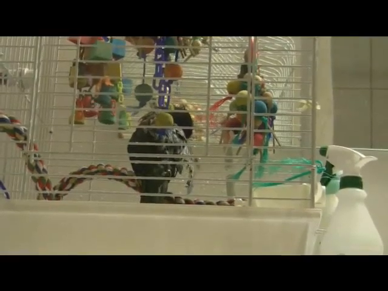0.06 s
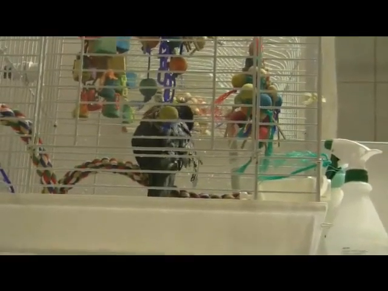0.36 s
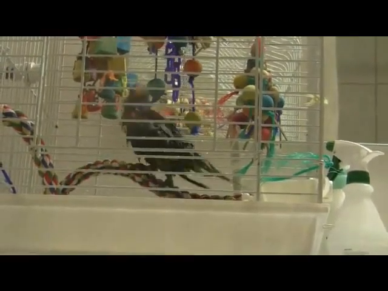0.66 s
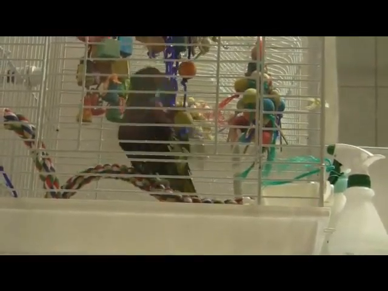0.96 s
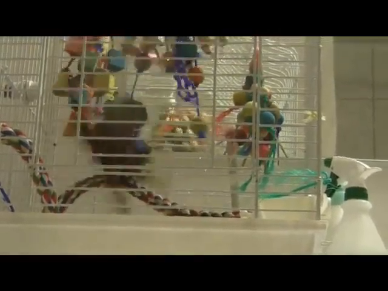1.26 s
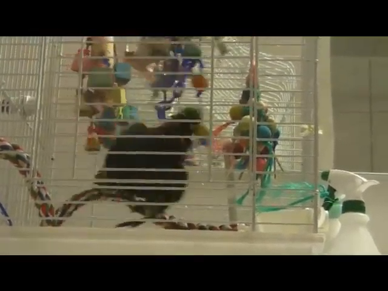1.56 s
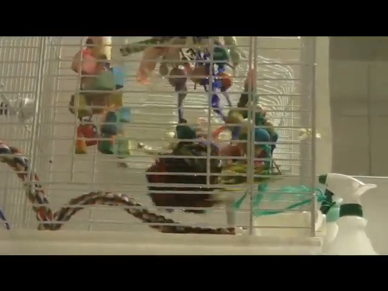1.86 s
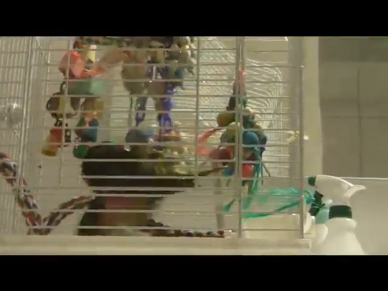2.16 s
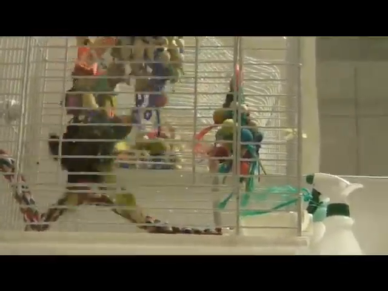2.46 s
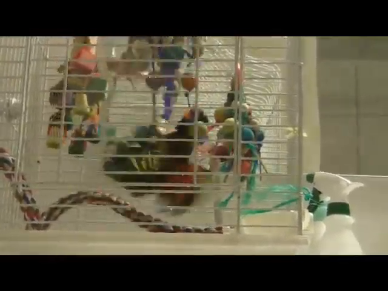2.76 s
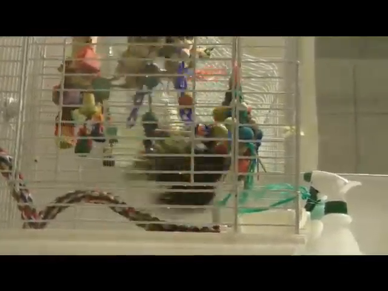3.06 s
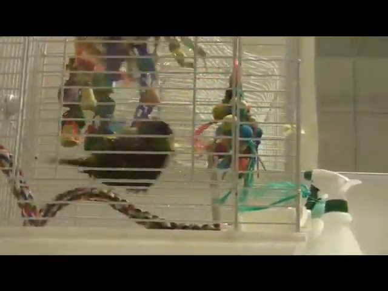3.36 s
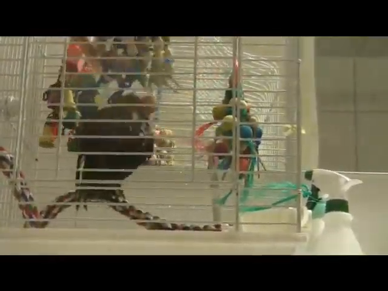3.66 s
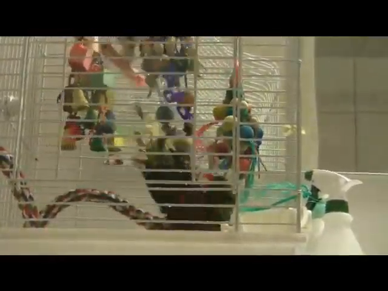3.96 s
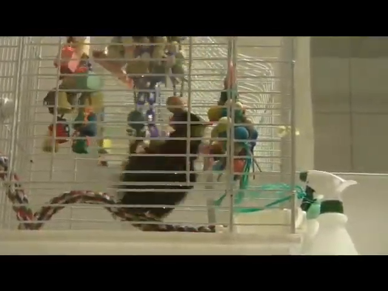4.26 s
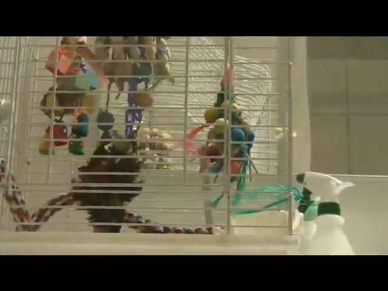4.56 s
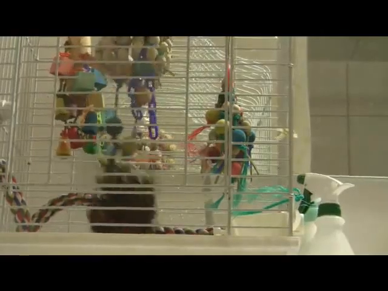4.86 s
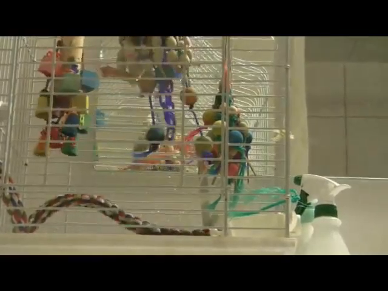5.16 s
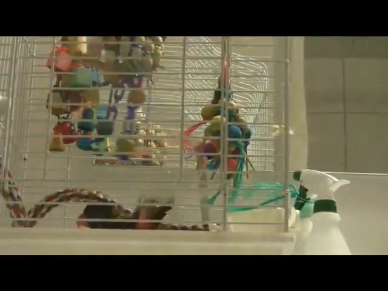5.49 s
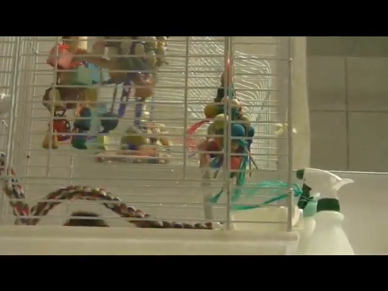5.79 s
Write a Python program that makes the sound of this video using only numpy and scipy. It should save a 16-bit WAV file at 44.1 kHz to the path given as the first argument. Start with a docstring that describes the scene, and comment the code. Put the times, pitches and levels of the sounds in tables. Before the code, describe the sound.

A parrot clambers about its wire cage, feathers rustling in short flutters while hanging toys knock, a chain clinks and the wires ring faintly. After about four seconds it gives one loud squawk that rises from a rasp to a shrill whistle and falls back. A quick run of soft wing beats follows. The sound is fairly close, in a small tiled room with a short reverberation and a faint rush of air.

```python
"""A soft rush of room air and a few light knocks come first, as a parrot clambers about its wire cage.
Its feathers rustle by friction; toys, chain links and wires are struck and ring as damped resonators.
It gives one loud squawk, the membranes of its syrinx breaking from a rasp into a rising whistle and
back, then beats its wings on the cage floor. The tiled room adds a short reverberation."""
import sys
import numpy as np
from scipy import signal
from scipy.fft import rfft, irfft
from scipy.io import wavfile
from scipy.ndimage import uniform_filter1d, minimum_filter1d

SR = 44100
rng = np.random.default_rng(int(sys.argv[2]) if len(sys.argv) > 2 else 0)


def store_wav(level_fs):
    """Save 16-bit WAV to argv[1]."""
    pcm = np.round(np.clip(np.atleast_2d(level_fs), -1, 1) * 32767)
    wavfile.write(sys.argv[1], SR, pcm.T.astype(np.int16))


N = 265923
TIME = np.arange(N) / SR

# The diffuse field at two close microphones. Each row: frequency in Hz, coherence from 0 to 1.
COHERENCE = [(30, 0.36), (70, 0.66), (250, 0.69), (600, 0.554), (2000, 0.23), (5000, 0.089), (9000, 0.16),
             (15000, .15)]
# The tiled room. Each row: frequency in Hz, reverberation time in seconds.
ROOM_T60 = [(200, 0.33), (1000, 0.388), (3000, 0.24), (6000, 0.286), (10000, 0.32), (16000, 0.03)]
# Spectra of the room's rush, air pushed by wings, feather rustle, feather fizz, a wing beat and a
# chain link. Each row: frequency in Hz, relative level in dB.
RUSH_SPECTRUM = [(12, -37), (20, -15), (53, -6), (86, -15.5), (123, -7), (177, -17.5), (221, -3.5),
                 (247, -5), (409, -11.5), (445, -8), (757, -14.5), (947, -17.5), (1480, -21), (5510, -28.5),
                 (15900, -39)]
AIR_SPECTRUM = [(40, -27), (80, -7.5), (125, 0), (170, -11.5), (240, 4), (400, 1.5), (1000, -2.5),
                (1500, -10), (2200, -12.5), (4000, -49.5)]
RUSTLE_SPECTRUM = [(700, -28.5), (1600, -0.5), (3000, 0), (4800, -1.5), (6500, -17.5), (10000, -44.5)]
FIZZ_SPECTRUM = [(3500, 4), (6500, 2.5), (9200, 0), (11000, -3), (13000, -7.5), (16000, -13)]
WING_SPECTRUM = [(100, -8.5), (350, -31), (700, -3), (1100, -3.5), (1700, 0), (2200, -13.5), (5000, -20),
                 (10000, -27), (16000, -38)]
LINK_SPECTRUM = [(3000, -18), (7000, -17.5), (8400, -6.5), (9000, -0.5), (9400, -5), (10200, -17),
                 (15000, -27.5)]
# Jolts of the cage wall. Each row: start in seconds, level in dB, brightness in dB per octave.
WALL_JOLTS = [(1.214, -76, -11), (1.345, -52.5, -10), (2.3, -68.5, 1), (2.419, -66, 2.5), (2.499, -64, -24),
              (5.634, -65, -13)]
# Modes of the wall's wires. Each row: frequency in Hz, T60 in seconds, relative level in dB.
WIRE_MODES = [(969, 0.74, -2), (1050, 0.63, -2.5), (1640, 1, -5.5), (2000, 0.6, 0), (2860, 0.23, -15),
              (3407, 0.21, 4.5), (4350, 0.25, -13.5), (4900, 0.66, -21)]
# Knocks of toys, beak and claws. Each row: start in seconds, relative level in dB, centre frequency
# in Hz, half-width in octaves, T60 in seconds.
TOY_KNOCKS = [ (0.431, -62.5, 5130, 0.67, 0.086), (0.830, -57, 1560, 0.454, 0.12),
              (1.03, -56.5, 3850, 0.65, 0.029), (1.187, -42.5, 10800, 0.13, 0.09),
              (1.203, -35.5, 3315, 0.475, 0.11), (1.209, -35.5, 3460, 0.47, 0.078),
              (1.280, -48, 11900, 0.23, 0.091), (1.449, -41, 3300, 0.44, 0.04),
              (1.574, -55.5, 6940, 0.53, 0.02), (1.657, -55, 7060, 0.54, 0.039),
              (1.684, -51, 2980, 1.3, 0.0423), (2.060, -41.5, 4310, 0.71, 0.017),
              (2.302, -50, 1550, 0.12, 0.1), (2.354, -41, 270.3, 0.23, 0.066),
              (2.440, -44, 684, 1.2, 0.044), (2.741, -51.5, 7000, 2.1, 0.045),
              (2.745, -50.5, 790, 0.68, 0.066), (2.891, -47, 4500, 1.1, 0.078),
              (2.938, -43.5, 3470, 0.36, 0.021), (3.468, -57, 5560, 0.92, 0.113),
              (3.678, -49.5, 5540, 0.8, 0.042), (3.762, -57, 2820, 0.43, 0.05),
              (3.950, -52, 2891, 0.766, 0.51), (3.993, -49, 4970, 0.4, 0.054),
              (5.193, -47, 5343, 0.1, 0.068), (5.939, -49, 2550, 0.7, 0.113)]
# Clinks of the chain. Each row: start in seconds, relative level in dB, T60 in seconds.
CHAIN_CLINKS = [(1.131, -49.5, 0.325), (1.819, -48.5, 0.052), (2.535, -55, 0.11), (2.816, -45, 0.0407),
                (3.043, -56, 0.14), (3.355, -54.5, 0.087), (3.470, -59.5, 0.105), (3.527, -52, 0.23),
                (3.842, -63.5, 0.54), (3.869, -60, 0.206), (3.905, -52.5, 0.205), (3.937, -46.5, 0.084),
                (3.994, -42.5, 0.0395), (4.130, -60, 0.18)]
# Plucks of a cage bar. Each row: start in seconds, relative level in dB.
BAR_PLUCKS = [(2.245, -46), (5.120, -47.5), (5.845, -57)]
# Modes of that bar. Each row: frequency in Hz, relative level in dB, T60 in seconds.
BAR_MODES = [(2812, 0, 0.21), (4416, -3, 0.08), (5040, -10, 0.11), (6300, -5, 0.071), (7747, -12, .12),
             (8650, -5.5, .1)]
# Hops, flutters and shuffles. Each row: start in seconds, length in seconds, effort in dB, scrape in dB.
BIRD_MOVES = [ (0.819, 0.0285, -70, 4.5), (0.947, 0.066, -61.5, -24), (1.117, 0.027, -69.5, 5.5),
              (1.154, 0.18, -48.5, -2), (1.386, 0.256, -62.5, -5.5), (1.656, 0.053, -61, -2),
              (1.761, 0.065, -70, 4), (1.974, 0.102, -61, -3.5), (2.166, 0.034, -62.5, -5),
              (2.234, 0.044, -57.5, 4.5), (2.291, 0.136, -56, 1), (2.501, 0.05, -62, 1),
              (2.724, 0.163, -65.5, 4), (2.874, 0.0595, -59.5, -1), (2.994, 0.056, -68.5, 10.5),
              (3.111, 0.74, -72.5, 5.5), (3.546, 0.11, -70, -1), (3.841, 0.09, -70.5, 3),
              (3.938, 0.025, -62, 2), (4.127, 0.035, -80.5, -2), (4.373, 0.045, -62.5, -5),
              (5.125, 0.04, -50.5, -8), (5.294, 0.13, -60.5, -6.5), (5.494, 0.258, -56.5, -11),
              (5.715, 0.033, -57.5, 2.5), (5.923, 0.084, -60.5, 0.5)]
# Wing beats. Each row: start in seconds, level in dB, length in seconds, treble tilt in dB per octave.
WING_BEATS = [(1.181, -48, 0.032, 11), (2.347, -53.5, 0.0187, 13), (5.338, -59.5, 0.042, -1),
              (5.380, -52.5, 0.036, 2.5), (5.487, -52.5, 0.0324, 5), (5.54, -49, 0.043, 3.5),
              (5.628, -48.5, 0.049, 0.5), (5.717, -49.5, 0.0334, 6), (5.773, -56, 0.041, 8.5),
              (5.933, -56.5, 0.0254, 7)]
# The squawk's high and low notes. Each row: start in seconds, length in seconds, first and last pitch
# in Hz, relative level in dB, place of the peak from 0 to 1, roughness from 0 to 1.
WHISTLE_NOTES = [ (4.438, 0.0746, 2342, 2701, -22.5, 0.65, 0.16),
                 (4.506, 0.063, 2195, 2160, -29.5, 0.18, 0.7),
                 (4.613, 0.127, 3275, 4682, -12.5, 0.87, 0.18), (4.722, 0.060, 5767, 5516, -11, 0.4, 0.17),
                 (4.849, 0.05, 3725, 3520, -30, 0.25, 0.45), (4.859, 0.035, 3058, 2934, -24.5, 0.36, 0.46),
                 (4.897, 0.065, 3100, 2415, -29, 0.3, 0.8)]
CROAK_NOTES = [ (4.415, 0.031, 789, 802, -30.5, 0.5, 0.39), (4.519, 0.039, 794, 793, -26.5, 1, 0.62),
               (4.564, 0.026, 785, 784, -34.5, 0.55, 0.61), (4.833, 0.058, 1026, 999, -38.5, 0.5, 0.79),
               (4.912, 0.136, 830.2, 750.4, -28, 0.42, 0.66)]
# The throat's response with the beak wide and narrow. Each row: frequency in Hz, gain in dB.
WIDE_THROAT = [(1500, -24), (2400, 6), (3200, -0.5), (4300, 8), (5400, 7), (6400, -7.5), (8200, -14.5),
               (9100, -12.5), (10000, -15.5), (11200, -16), (12400, -26.5), (16000, -31)]
NARROW_THROAT = [(450, -31.5), (790, -9.5), (1150, -7.5), (1600, -8.5), (2300, 4.5), (3150, 8), (3700, -3),
                 (4300, 7), (5400, -15.5), (6000, -27), (6700, -12.5), (9000, -24.5), (16000, -47.5)]
# The voice's phase between the microphones. Each row: frequency in Hz, lead of the left in radians.
VOICE_PHASE = [(3000, -1), (5400, 0.6), (9000, 0.76), (11400, 2), (16000, 2.5)]
# The voice's balance between them. Each row: frequency in Hz, left minus right level in dB.
VOICE_BALANCE = [(4500, 0), (8100, -5), (15000, -6.5)]


def amp(db):
    """Amplitude grows tenfold for every 20 dB."""
    return 10 ** (np.asarray(db) / 20)


def unit(x):
    """Normalisation to an rms of 1."""
    return x / np.sqrt(np.mean(x ** 2) + 1e-20)


def read(points, hz):
    """Interpolation of a table on a log-frequency axis."""
    f, value = np.transpose(points)
    return np.interp(np.log(hz + 1), np.log(f + 1), value)


def bins(size):
    """Fourier frequencies in Hz for this many samples."""
    return np.fft.rfftfreq(size, 1 / SR)


def colour(x, spectrum):
    """Filtering by multiplication of spectra, at rms 1."""
    size = x.shape[-1]
    return unit(irfft(rfft(x) * amp(read(spectrum, bins(size))), size))


def wander(size, hz):
    """Low-passed noise: a smooth random fluctuation at rms 1."""
    return unit(irfft(rfft(rng.standard_normal(size)) / (1 + (bins(size) / hz) ** 4), size))


def add(mix, start, sound):
    """Superposition of a sound from its start in seconds."""
    part = mix[round(start * SR):][:len(sound)]
    part += sound[:len(part)]


def grains(size, per_s, spread_db):
    """Shot noise: tiny clicks at random times and of uneven strength."""
    strength = amp(spread_db * np.minimum(rng.exponential(1, size), 4))
    return unit(rng.standard_normal(size) * strength * (rng.random(size) < per_s / SR))


def burst(spectrum, t60):
    """A struck object's dense modes merge into exponentially decaying noise."""
    t = TIME[:SR // 3]
    return colour(rng.standard_normal(len(t)), spectrum) * amp(-60 * t / t60)


def diffuse_field(two):
    """Partial coherence: two unrelated signals become one field at two close microphones."""
    size = two.shape[-1]
    a, b = rfft(two)
    coherence = read(COHERENCE, bins(size))
    return irfft(np.array([a, coherence * a + np.sqrt(1 - coherence ** 2) * b]), size)


def room(x, wet_db, build_s):
    """Reverberation: sparse reflections follow the direct sound, each band decaying at its own rate."""
    size = SR * 3 // 4
    reflections = rng.choice([-1, 1], (2, size)) * (rng.random((2, size)) < 4000 / SR)
    hz, t, bands = signal.stft(diffuse_field(reflections), SR, nperseg=256)
    decay = amp(-60 * t / read(ROOM_T60, hz)[:, None])
    tail = signal.istft(bands * decay, SR, nperseg=256)[1][:, :size]
    tail *= 1 - np.exp(-TIME[:size] / build_s)
    return x + amp(wet_db) * signal.fftconvolve(x[None], unit(tail) / np.sqrt(size), axes=1)[:, :N]


def room_air(level_db=-64.5):
    """Ambient noise forms a diffuse field, heard as a soft steady rush."""
    return amp(level_db) * colour(diffuse_field(rng.standard_normal((2, N))), RUSH_SPECTRUM)


def wires():
    """Free vibration: the bird lands on the cage wall and its wires ring in damped modes."""
    out, t = np.zeros(N), TIME[:SR * 3 // 4]
    for start, db, bright_db in WALL_JOLTS:
        for hz, t60, mode_db in WIRE_MODES:
            strength_db = db + mode_db + bright_db * np.log2(hz / WIRE_MODES[0][0])
            add(out, start, amp(strength_db - 60 * t / t60) * np.sin(2 * np.pi * hz * t))
    return out


def toys(snap=0.14, snap_s=0.0018):
    """Impact excitation: each knock of toy, beak or claw rings in one band after a brief snap."""
    out, hz = np.zeros(N), np.geomspace(50, SR / 2, num=120)
    for start, db, centre_hz, octaves, t60 in TOY_KNOCKS:
        band_db = -14 * np.log10(1 + (np.log2(hz / centre_hz) / octaves) ** 4)
        knock = burst(np.c_[hz, band_db], t60)
        add(out, start, amp(db) * knock * (1 + snap * np.exp(-TIME[:len(knock)] / snap_s)))
    return out


def chain(ring_db=-3, chatter_db=3.02, tick_db=-8):
    """Repeated collision: a link ticks, then chatters against its neighbours as it rings."""
    out = np.zeros(N)
    for start, db, t60 in CHAIN_CLINKS:
        ring = burst(LINK_SPECTRUM, t60)
        add(out, start, amp(db + ring_db + chatter_db * wander(len(ring), hz=120)) * ring)
        add(out, start, amp(db + tick_db) * burst(FIZZ_SPECTRUM, t60=0.0054))
    return out


def bar():
    """A cage bar released by a claw vibrates in inharmonic bending modes."""
    out, t = np.zeros(N), TIME[:SR // 2]
    for start, db in BAR_PLUCKS:
        for hz, mode_db, t60 in BAR_MODES:
            add(out, start, amp(db + mode_db - 60 * t / t60) * np.sin(2 * np.pi * hz * t))
    return out


def effort(scrape_share, fall_db_per_s, rise_s=0.02, sag_db_per_s=14):
    """The amplitude envelope of the moves: each rises quickly, slackens, then dies away."""
    envelope, t = np.zeros(N), TIME[:SR]
    rise = np.minimum(t / rise_s, 1)
    for start, length, db, scrape_db in BIRD_MOVES:
        loss_db = sag_db_per_s * t + fall_db_per_s * np.maximum(t - length, 0)
        add(envelope, start, rise * amp(db + scrape_share * scrape_db - loss_db))
    return envelope


def feathers(air_db=-5, rustle_db=-8, fizz_db=-5):
    """Turbulence and friction: wings push air while their barbs scrape past each other in fine grains."""
    air = colour(rng.standard_normal(N), AIR_SPECTRUM) * amp(air_db + 2 * wander(N, hz=25))
    stroke = amp(0.5 * wander(N, hz=30))
    rustle = colour(grains(N, per_s=1800, spread_db=2.5), RUSTLE_SPECTRUM) * amp(rustle_db) * stroke
    fizz = colour(grains(N, per_s=4400, spread_db=3), FIZZ_SPECTRUM) * amp(fizz_db) * stroke
    return (air * effort(scrape_share=0, fall_db_per_s=61.5)
            + rustle * effort(scrape_share=0.44, fall_db_per_s=109.5)
            + fizz * effort(scrape_share=1, fall_db_per_s=146.5))


def wings():
    """Air displacement: each downstroke radiates a short swell of feathery noise."""
    out, t = np.zeros(N), TIME[:SR // 4]
    for start, db, length, treble_db in WING_BEATS:
        tilted = [(hz, level + treble_db * np.log2(1 + hz / 4000)) for hz, level in WING_SPECTRUM]
        noise = colour(grains(len(t), per_s=4500, spread_db=-4), tilted)
        u = 3 * t / length  # the swell peaks at u = 1
        add(out, start, amp(db) * u * np.exp(1 - u) * noise)
    return out


def syrinx(notes, throat, jitter, jitter_hz, shimmer, rasp, stiffen, overdrive, tremor_db):
    """Source and filter: the throat shapes a membrane's harmonics, which roughness shakes and frays."""
    out, k = np.zeros(N), np.arange(1, 19)[:, None]
    easy_db, end_db, fade_s = -22.5, -25, 0.0042
    for start, length, first_hz, last_hz, db, peak, roughness in notes:
        t = np.arange(0, length, 1 / SR)
        progress = t / length
        # A note is one arch of pressure, weaker and rougher at its slack ends.
        slack = np.interp(progress, [0, peak, 1], [1, 0, 1]) ** 3.7
        rough = np.clip(roughness + 0.27 * slack, 0, 1)
        hz = first_hz + (last_hz - first_hz) * progress ** 0.55  # glides fastest at first
        phase = 2 * np.pi * np.cumsum(hz * (1 + jitter * rough * wander(len(t), jitter_hz))) / SR
        # A tighter membrane, or one driven above its easy level, has stronger overtones.
        tilt = stiffen * np.log2(hz / np.median(hz)) + overdrive * (db - easy_db) / 20 - 0.5
        harmonics = amp(read(throat, k * hz)) * k ** tilt * (k * hz < SR / 2)
        tone = (harmonics * np.sin(k * phase)).sum(0) / np.sqrt((harmonics ** 2).sum(0) / 2)
        breath = rng.standard_normal(len(t)) * (1 + np.cos(phase))  # one puff per cycle
        puffs = colour(breath, [(f, gain_db - np.log2(f)) for f, gain_db in throat])
        puff_share = np.clip(rasp * rough ** 2, 0, 1)
        voice = np.sqrt(1 - puff_share) * tone + np.sqrt(puff_share) * puffs
        voice *= np.exp(shimmer * rough * wander(len(t), hz=200))
        tremor = amp(tremor_db * wander(len(t), hz=110))
        fade = np.minimum(1, np.minimum(t, t[-1] - t) / fade_s)
        add(out, start, amp(db + end_db * slack) * unit(voice * tremor) * fade)
    return out


def squawk(depth_db=-34, modulation_hz=3930):
    """Two-voice phonation: whistles and croaks overlap as the two sides of the syrinx take turns."""
    whistles = syrinx(WHISTLE_NOTES, WIDE_THROAT, jitter=0.062, jitter_hz=520, shimmer=0.5,
                      rasp=0, stiffen=0, overdrive=1.2, tremor_db=2.8)
    croaks = syrinx(CROAK_NOTES, NARROW_THROAT, jitter=0.079, jitter_hz=320.3, shimmer=0.37,
                    rasp=0.69, stiffen=0.89, overdrive=0, tremor_db=2)
    # Amplitude modulation sets faint sidebands a steady step below and above each harmonic.
    whistles *= 1 + amp(depth_db) * np.sin(2 * np.pi * modulation_hz * TIME)
    return amp(-1) * whistles + amp(-2.5) * croaks


def voice_direction(two):
    """Localisation cues: sound from the bird's side meets the microphones at unlike phase and level."""
    hz = bins(N)
    half = amp(read(VOICE_BALANCE, hz) / 2) * np.exp(0.5j * read(VOICE_PHASE, hz))
    return irfft(rfft(two) * np.array([half, 1 / half]), N)


def scene():
    """Superposition of the room's rush and the reverberant bird and cage."""
    rush = room_air()
    voice = voice_direction(room(squawk(), wet_db=-1.5, build_s=0.00088))
    movement = room(feathers() + wings() + wires(), wet_db=-2.5, build_s=0.00069)
    clatter = room(amp(-5.5) * (toys() + chain() + bar()), wet_db=0, build_s=0.0006)
    lean_right = amp([[-0.5], [0.5]])
    return rush + (movement + clatter) * lean_right + voice


def record(dry):
    """Peak limiting eases down whatever exceeds the ceiling; a low-pass filter then limits the band."""
    ceiling, cutoff_hz = 0.85, 15800
    needed = ceiling / np.maximum(abs(dry).max(0), ceiling)
    gain = uniform_filter1d(minimum_filter1d(needed, size=600), size=600)
    lowpass = signal.firwin(511, cutoff_hz, window=("kaiser", 9), fs=SR)
    return signal.oaconvolve(dry * gain, lowpass[None], "same")


dry = scene()
out = record(dry)
store_wav(out)
```